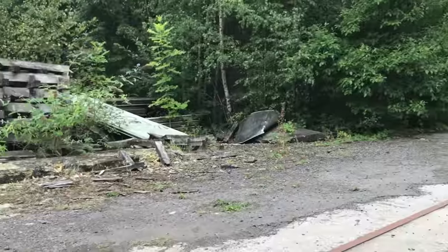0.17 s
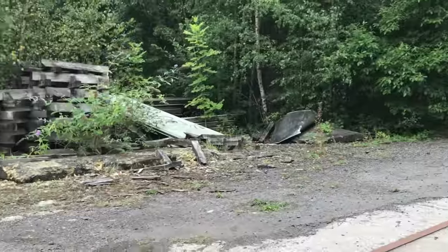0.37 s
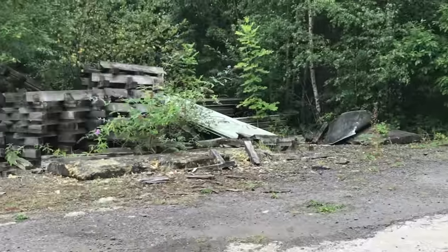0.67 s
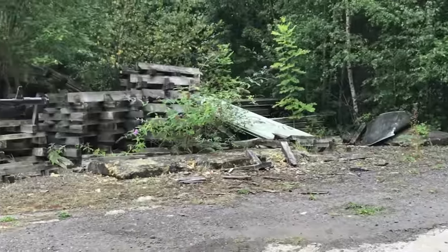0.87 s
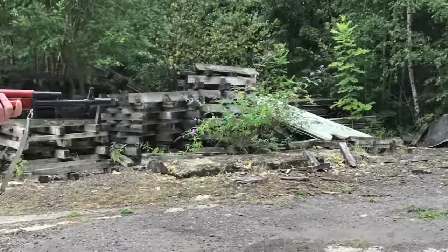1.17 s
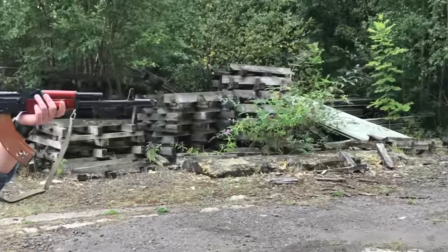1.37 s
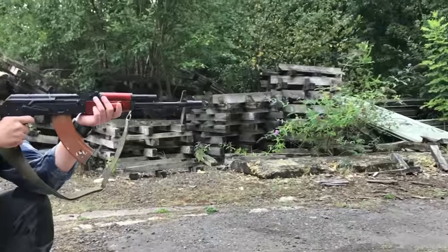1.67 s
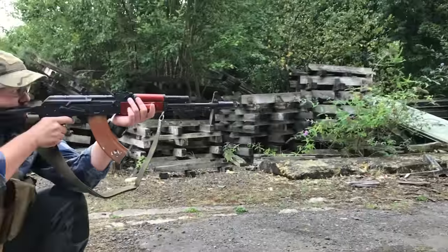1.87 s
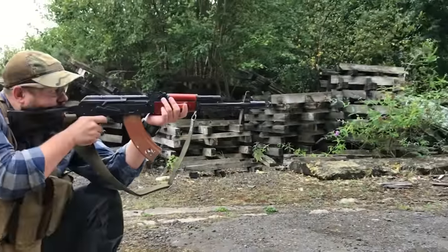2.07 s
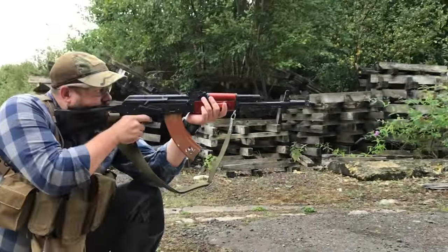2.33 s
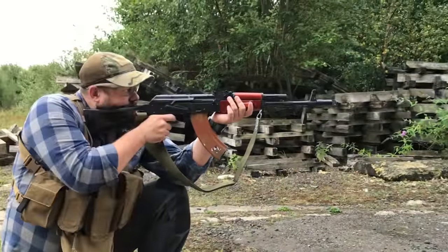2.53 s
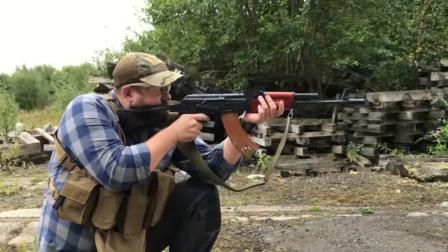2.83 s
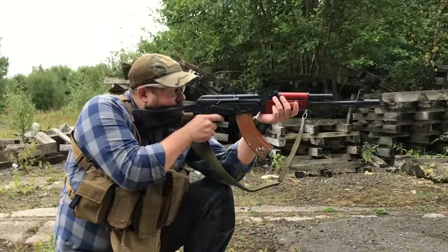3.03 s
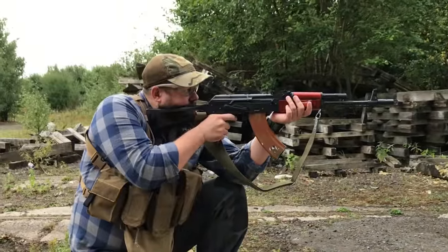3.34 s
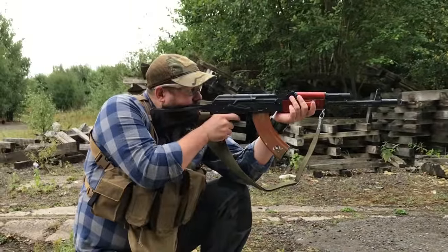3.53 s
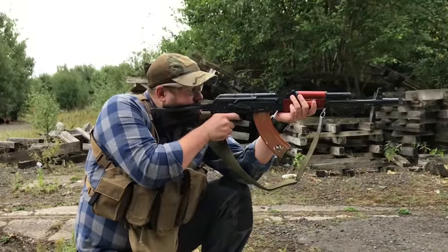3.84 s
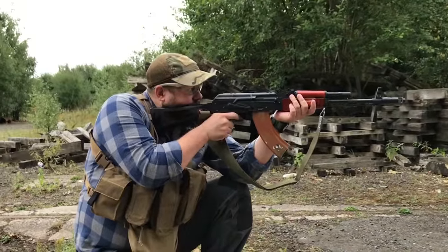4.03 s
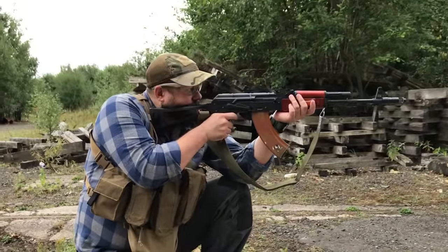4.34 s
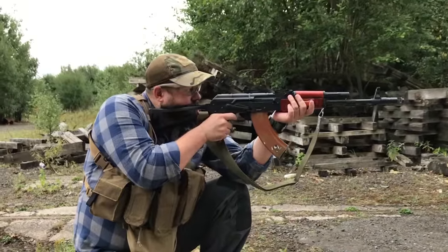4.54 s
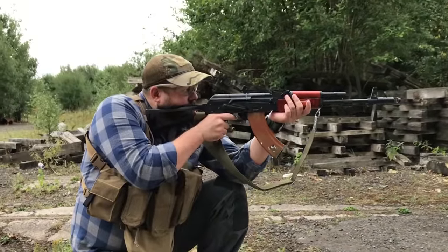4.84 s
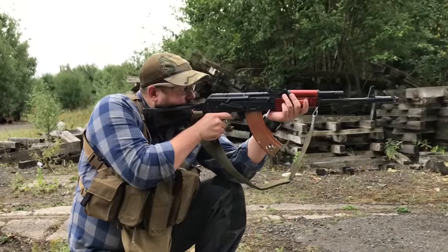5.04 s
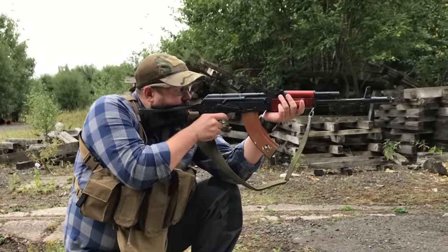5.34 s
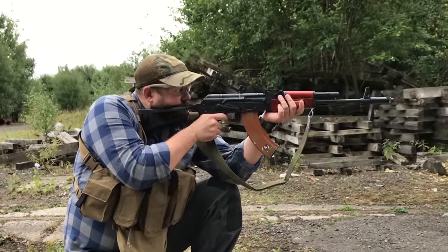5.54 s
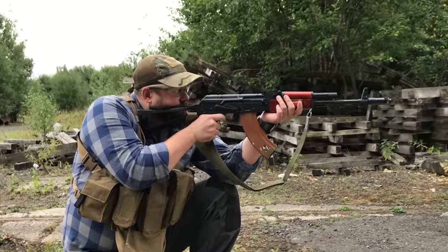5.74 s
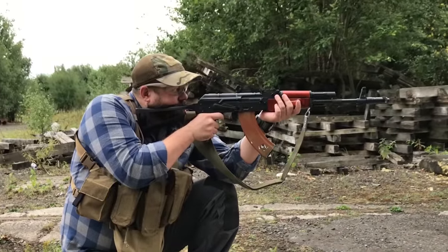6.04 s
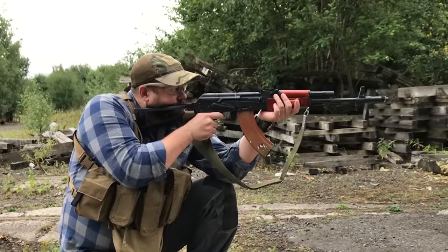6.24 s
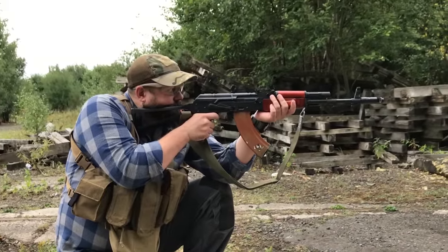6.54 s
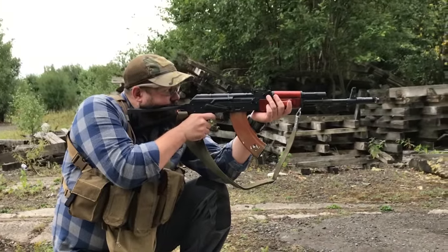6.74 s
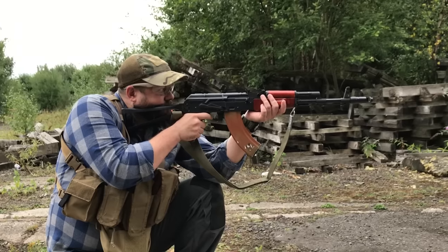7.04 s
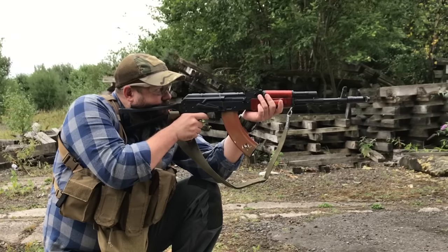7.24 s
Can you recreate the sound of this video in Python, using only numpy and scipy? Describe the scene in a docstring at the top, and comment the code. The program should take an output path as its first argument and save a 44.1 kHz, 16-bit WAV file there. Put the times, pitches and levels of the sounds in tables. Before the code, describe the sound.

Quiet outdoor murmur with two tiny far chirps, then an electric airsoft rifle very close to the microphone. Each shot is a brief gear whirr, a hard piston slam and muzzle pop, then gears coasting down and a latch knocking. Four spaced shots, a pause, another single, another pause, then five in fast succession. Nearby wood and gravel scatter a short tail; trees return a soft wash.

```python
"""A faint outdoor murmur (coloured noise) and two far bird chirps (noise bursts) open the scene.
Then an electric airsoft rifle fires ten shots close to the microphone: first singly, then in quick succession.
Each shot: the trigger clicks, the gears wind the piston back (noise and tones at the tooth rate), the piston
slams and the muzzle pops (struck modes and noise), the gears coast down and a latch knocks as they stop.
The spring sings on, nearby wood and gravel scatter a tail, the trees answer softly; the input clips hard."""
import sys
import numpy as np
from scipy import signal
from scipy.fft import rfft, irfft, next_fast_len
from scipy.io import wavfile

SR = 44100
rng = np.random.default_rng(int(sys.argv[2]) if len(sys.argv) > 2 else 0)


def dump(signal):
    """Clip the signal to [-1, 1] and save it as 16-bit WAV at the path in sys.argv[1]."""
    limited = np.clip(np.atleast_2d(signal).T, -1, 1)
    pcm = np.round(limited * 32767).astype(np.int16)
    wavfile.write(sys.argv[1], SR, pcm)


N = 326366
TIME = np.arange(N) / SR

# the shots: slam_s, full_load_s (from full motor load to the slam), trigger_db, spring_ring_db
SHOTS = [(1.1174, 0.016, -41.5, -65), (1.7035, 0.025, -47, -58), (2.1700, .022, -29, -40),
         (2.634, 0.017, -37.5, -34.5), (4.7326, 0.028, -49.5, -60), (6.2360, .021, -36.5, -39),
         (6.6287, 0.023, -36.5, -33), (6.8874, .025, -24, -44), (7.0986, 0.039, -23.5, -46),
         (7.3042, 0.037, -42, -51)]
SLAMS = np.array(SHOTS)[:, 0]
TRIGGER_LEAD_S = .046   # one gear cycle, from the trigger to the slam


def from_db(db):
    """Decibels to amplitude."""
    return 10 ** (np.asarray(db) / 20)


def rms_one(x):
    """Scale to an rms of 1."""
    return x / np.sqrt(np.mean(x ** 2) + 1e-20)


def coloured(x, spectrum):
    """Shape a steady signal by a gain curve, falling away below its first point; rms 1."""
    size = next_fast_len(N)
    hz, db = np.transpose(spectrum)
    bins = np.maximum(np.fft.rfftfreq(size, 1 / SR), 1)
    gain = from_db(np.interp(np.log(bins), np.log(hz), db))
    gain = gain * np.minimum(bins / hz[0], 1) ** 2
    return rms_one(irfft(rfft(x, size) * gain, size)[:N])


def butter(x, hz, kind, order=2):
    """Causal Butterworth filter."""
    sos = signal.butter(order, np.clip(hz, 10, .45 * SR), kind, fs=SR, output="sos")
    return signal.sosfilt(sos, x + 1e-18)


def clicks(times, sizes):
    """Single-sample impulses."""
    samples = np.round(np.asarray(times) * SR).astype(int)
    return np.bincount(samples, sizes, N)[:N]


def ring(x, hz, t60):
    """A resonator: a unit click sets a sine of height 1 ringing, 60 dB down after t60 seconds."""
    r = from_db(-60 / (t60 * SR))
    w = 2 * np.pi * hz / SR
    return signal.lfilter([0, np.sin(w)], [1, -2 * r * np.cos(w), r * r], x + 1e-18)


def struck(modes, times, vary_db):
    """Every blow excites each mode with a slightly different strength."""
    spread = rng.standard_normal((len(times), len(modes)))
    total = 0
    for k, (hz, db, t60) in enumerate(modes):
        total = total + ring(clicks(times, from_db(db + vary_db * spread[:, k])), hz, t60)
    return total


def bursts(times, levels_db, t60):
    """Envelope that jumps at each time and dies away."""
    return signal.lfilter([1], [1, -from_db(-60 / (t60 * SR))], clicks(times, from_db(levels_db)) + 1e-18)


def delayed(x, seconds):
    """The same sound, later."""
    return np.interp(TIME - seconds, TIME, x, left=0)


def through_gearbox(x):
    """The shell adds its resonances to whatever shakes it."""
    # shell resonances: pitch_hz, width_hz, gain_db
    shell_modes = [(3030, 160, -7.5), (4356, 580, -4), (5300, 130, 0), (6850, 490, -0.5)]
    resonances = 0
    for hz, width, db in shell_modes:
        resonances = resonances + from_db(db) * signal.lfilter(*signal.iirpeak(hz, hz / width, SR), x)
    return x + resonances


def background():
    """Distant traffic and leaves merge into a murmur: noise of fixed colour and slowly drifting level."""
    # level of the murmur: time_s, level_db
    drift = [(0, -52.5), (1.0, -52.5), (2.5, -50), (3.5, -53.5), (4.5, -54), (5.8, -54), (7.4, -52)]
    # colour of the murmur: pitch_hz, gain_db
    murmur_spectrum = [(40, -25.5), (80, -11.5), (130, -7.5), (200, -2), (320, -4), (450, -7.5),
                       (700, -6.5), (1000, 0), (1300, -4.5), (2000, -15.5), (3200, -30), (5000, -38),
                       (8000, -44.5), (15500, -49.5)]
    level = from_db(np.interp(TIME, *np.transpose(drift)))
    return level * coloured(rng.standard_normal(N), murmur_spectrum)


def bird(low_hz=3450, high_hz=3800):
    """Far chirps blurred by the wood: swells of narrow-band noise."""
    # chirps: centre_s, half_length_s, level_db
    chirps = [(.46, .04, -73), (0.747, .02, -77)]
    level = sum(from_db(db) * np.exp(-((TIME - s) / length) ** 2) for s, length, db in chirps)
    return level * rms_one(butter(rng.standard_normal(N), [low_hz, high_hz], "band"))


def trigger_ticks(t60=.028, low_hz=2800, high_hz=5500):
    """A small, thin click as the motor starts: a burst of band-limited noise."""
    _, _, db, _ = np.transpose(SHOTS)
    envelope = butter(bursts(SLAMS - TRIGGER_LEAD_S, db, t60), 400, "low")   # softens the onset
    return envelope * rms_one(butter(rng.standard_normal(N), [low_hz, high_hz], "band", order=3))


def gears(mesh_top_hz=1550, slowing_per_s=10.0, start_db=-42.5, release_db=-6.5, coast_s=.049,
          stop_t60=0.12, body_t60=.17, wind_up_db=-17, coasting_db=-16, grind_db=-2.0, whine_db=-11.0,
          octave_db=-4.0, rattle_db=2.0, rattle_hz=180, rebound_db=1.0):
    """Teeth meet at the mesh rate: it climbs as the motor winds the spring and sinks as the motor runs out."""
    # grinding under load: pitch_hz, gain_db
    load_spectrum = [(200, -30.5), (360, -25.5), (520, -7.5), (650, 1.5), (780, -7.5), (1150, -3),
                     (2100, -4.5), (3000, -1), (4400, -3.5), (7000, -7.5), (8500, -14.5), (11000, -16),
                     (15500, -17)]
    # grinding while running free: pitch_hz, gain_db
    free_spectrum = [(220, -26), (350, -17), (560, -1), (730, -10.5), (950, 2), (1200, 0), (1600, -5),
                     (2100, -2.5), (4300, -7.5), (7000, -11), (8500, -14), (11000, -17.5), (15500, -17)]
    mesh_hz, winding, scraping, rumbling = np.zeros((4, N))
    for slam, pull_s, _, _ in SHOTS:
        trigger, loaded = slam - TRIGGER_LEAD_S, slam - pull_s
        span = (TIME >= trigger) & (TIME < slam + .2)
        t = TIME[span]
        after = np.maximum(t - slam, 0)
        spin_up = 1 - np.exp(-(t - trigger) / 0.0083)
        speed = spin_up * np.exp(-slowing_per_s * np.maximum(after - .01, 0))
        mesh_hz[span] = mesh_top_hz * speed * (1 + .025 * rng.standard_normal())
        # the grinding swells with the load and drops once the last tooth lets the piston go
        load_db = np.interp(t, [trigger, loaded, slam - .013, slam - .007], [start_db, 0, 0, release_db])
        winding[span] += from_db(wind_up_db + load_db) * (t < slam)
        # the piston rebounds once against the running gears
        rebound = rebound_db * np.exp(-((after - .019) / 0.0082) ** 2)
        running = from_db(coasting_db + rebound) * (t >= slam)
        # as the gears slow, the treble dies first
        stopping = np.maximum(after - coast_s, 0)
        scraping[span] += running * from_db(-60 * stopping / stop_t60)
        rumbling[span] += running * from_db(-60 * stopping / body_t60)
    turns = np.cumsum(mesh_hz) / SR   # mesh cycles so far
    # tooth contacts come in very different sizes, and backlash bunches them
    sizes = np.exp(.4 * rng.standard_normal(N))
    contacts = through_gearbox(rng.standard_normal(N) * sizes)
    flutter = rms_one(butter(rng.standard_normal(N), rattle_hz, "low"))
    rattle = rms_one(from_db(rattle_db * flutter))
    free = coloured(contacts, free_spectrum)
    body = butter(free, 2200, "low", order=1)
    grinding = winding * coloured(contacts, load_spectrum) + rumbling * body + scraping * (free - body)
    whine = scraping * np.sin(2 * np.pi * turns)
    whine = whine + from_db(octave_db) * (scraping + winding) * np.sin(4 * np.pi * turns)
    return rattle * (from_db(grind_db) * grinding + from_db(whine_db) * whine)


def blows(piston_db=0.0, muzzle_db=0.0, crack_db=-12.0, pop_crack_db=-9.0, crack_t60=0.039, rush_db=-13.0,
          rush_s=0.0047, muzzle_delay_s=.0053, ground=0.41, ground_delay_s=.00214, low_cut_hz=300):
    """The piston rushes into the cylinder head, air pops from the muzzle; the ground echoes ringing and rush."""
    # casing struck by the piston: pitch_hz, level_db, t60_s
    piston_modes = [(633, -16.5, 0.047), (1006, -10.5, 0.058), (1680, 1.5, .03), (2011, -4.5, 0.044),
                    (2570, -6.5, .035), (2990, -15, 0.049), (4190, -16.5, 0.037)]
    # barrel as the air leaves it: pitch_hz, level_db, t60_s
    muzzle_modes = [(383, -23, 0.065), (495, -14.5, 0.039), (626, -8, 0.044), (890, -4, 0.0094),
                    (1183, 6.5, .026), (1535.4, 1.5, .026), (1983, -5, 0.027), (2700, -14, 0.014)]
    # noisy crack of both blows: pitch_hz, gain_db
    crack_spectrum = [(250, -22.5), (600, -0.5), (1200, 2.5), (3200, -5), (5500, -8.5), (8000, -17.5),
                      (15500, -21)]
    each = np.ones(len(SLAMS))
    pops = SLAMS + muzzle_delay_s + rng.normal(0, .00005, len(SLAMS))
    piston = from_db(piston_db) * struck(piston_modes, SLAMS, vary_db=2.16)
    muzzle = from_db(muzzle_db) * struck(muzzle_modes, pops, vary_db=1.46)
    cracks = bursts(SLAMS, crack_db * each, crack_t60) + bursts(pops, pop_crack_db * each, crack_t60)
    crack = butter(cracks, 420, "low") * coloured(rng.standard_normal(N), crack_spectrum)
    # a decay run backwards swells up to each slam
    backwards = clicks(SLAMS, each)[::-1] + 1e-18
    swell = signal.lfilter([1], [1, -np.exp(-1 / (rush_s * SR))], backwards)[::-1]
    rush = from_db(rush_db) * swell * rms_one(butter(rng.standard_normal(N), [700, 2200], "band", order=1))
    direct = butter(piston + muzzle + rush, low_cut_hz, "high")
    return direct + ground * delayed(direct, ground_delay_s) + crack


def spring(hz=2272, t60=.55):
    """The main spring sings on after a release, some times more than others: one decaying sine."""
    *_, ring_db = np.transpose(SHOTS)
    return ring(clicks(SLAMS, from_db(ring_db)), hz, t60)


def bounces(count=3, shrink=.75):
    """The latch catches the stopping gears, then knocks ever quicker and weaker: times and dB."""
    # catches: catch_s, relative_level_db, first_bounce_s (after the catch), loss_per_bounce_db
    catches = [(1.2132, -13, 0.025, 7.5), (1.7938, -14, 0.022, 5), (2.2726, -10, 0.021, 12.5),
               (2.736, -13, 0.021, 18), (4.8272, -17, 0.011, 8), (6.3269, -14, 0.0094, 6.5),
               (6.7412, -6.5, .0255, 7), (6.987, -10.5, 0.037, 21), (7.205, -7.5, .018, 10.5),
               (7.3897, -24, 0.018, 10)]
    s, db, gap, loss_db = np.array(catches).T[:, :, None]
    k = np.arange(count)
    elapsed = np.cumsum(shrink ** k) - shrink ** k   # in first gaps; each gap is a share of the last
    return (s + gap * elapsed).ravel(), (db - loss_db * k).ravel()


def clacks(level_db=-8.0, t60=.03, rebound=0.6, rebound_s=0.0018, split_hz=2500, rise_hz=350,
           neutral_db=-18.0, thinning=0.18):
    """Each knock rattles parts in the casing, with one rebound; the lighter the knock, the thinner it sounds."""
    # parts knocking in the casing: pitch_hz, gain_db
    casing_spectrum = [(300, -30), (600, -10), (1100, 4), (1700, -3.5), (2300, -2.5), (3200, -3),
                       (5000, -8), (7000, -11), (9000, -14.5), (15500, -17.5)]
    times, db = bounces()
    bright_db = thinning * (neutral_db - db)
    rattle = coloured(through_gearbox(rng.standard_normal(N)), casing_spectrum)
    dull_level = butter(bursts(times, db - bright_db, t60), rise_hz, "low")
    sharp_level = butter(bursts(times, db + bright_db, t60), rise_hz, "low")
    dull = butter(rattle, split_hz, "low") * dull_level
    sharp = butter(rattle, split_hz, "high") * sharp_level
    knocks = butter(dull - sharp, 450, "high")
    return from_db(level_db) * (knocks + rebound * delayed(knocks, rebound_s))


def pallets(x, db=-23.5, t60=0.25, low_hz=1500, high_hz=7000):
    """Nearby wood stacks and gravel scatter a short tail: convolution with decaying noise."""
    t = TIME[:SR // 2]
    scatter = butter(rng.standard_normal(len(t)), [low_hz, high_hz], "band", order=1)
    echo = scatter * from_db(-60 * t / t60) * (t > .012)
    return from_db(db) * signal.fftconvolve(x, echo / np.linalg.norm(echo))[:N]


def trees(db=-27.5, build_s=0.22):
    """The muzzle points at the wood, which returns each shot as a dull wash that builds slowly."""
    # wash in bands: pitch_hz, gain_db, t60_s
    wash_bands = [(200, 0.5, 2), (323, -2, 1.8), (600, -5, 1.9), (1060, 2.5, 1.9), (2180, -16, 2),
                  (4600, -21, 1.2), (9000, -35, 1.4)]
    t = TIME[:2 * SR]
    shots = clicks(SLAMS, np.ones(len(SLAMS)))
    wash = 0
    for hz, band_db, t60 in wash_bands:
        echo = from_db(band_db - 60 * t / t60) * (1 - np.exp(-(t / build_s) ** 2))
        # overlapping echoes add in power
        power = np.maximum(signal.fftconvolve(shots, echo ** 2)[:N], 0)
        octave = [hz / np.sqrt(2), hz * np.sqrt(2)]
        wash = wash + np.sqrt(power) * butter(rng.standard_normal(N), octave, "band", order=3)
    return from_db(db) * wash


def scene():
    """The rifle and its scattered tail, the wash of the trees, the murmur and the bird; one channel."""
    surroundings = background() + bird()
    gun = trigger_ticks() + gears() + blows() + spring() + clacks()
    return (surroundings + gun + pallets(gun) + trees())[None]


def record(dry, cutoff_hz=15900):
    """The input clips hard at full scale; the top is cut."""
    low_pass = signal.firwin(255, cutoff_hz, fs=SR)
    return signal.fftconvolve(np.clip(dry, -1, 1), low_pass[None], "same", axes=1)


dry = scene()
out = record(dry)
dump(out)
```